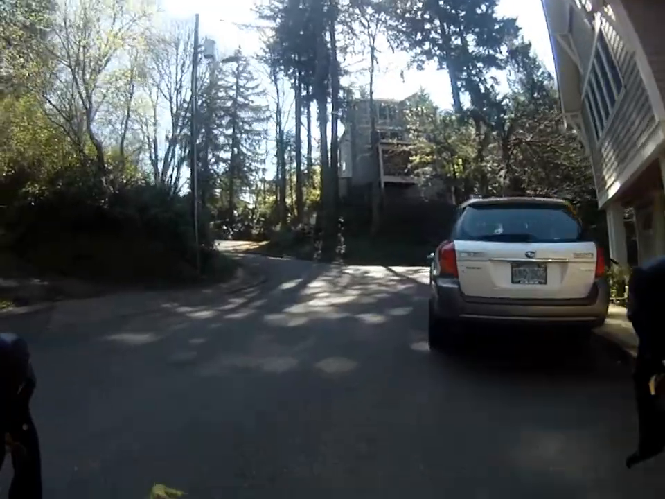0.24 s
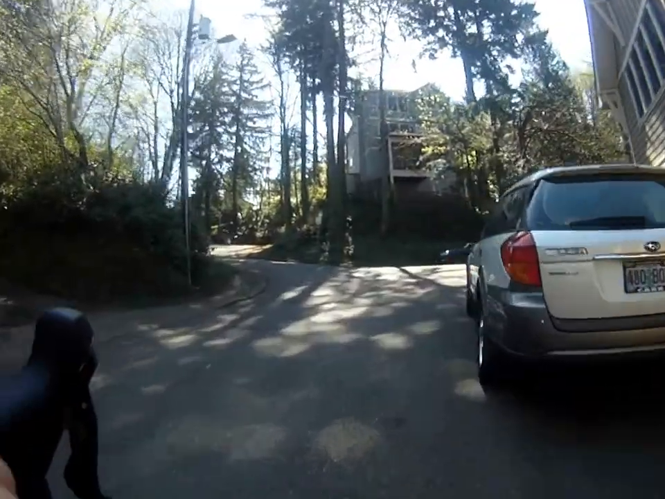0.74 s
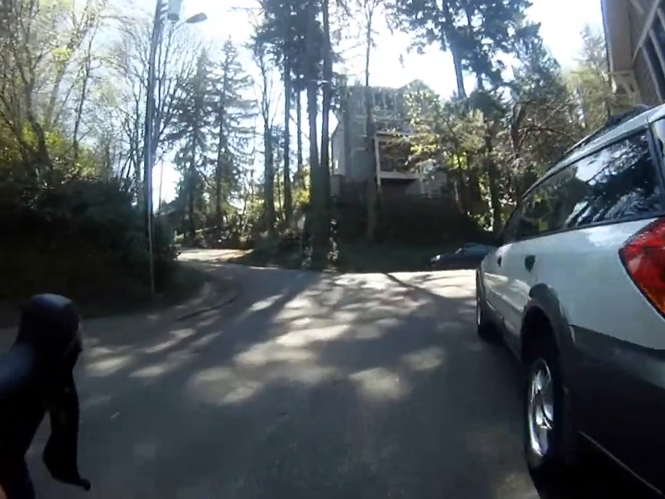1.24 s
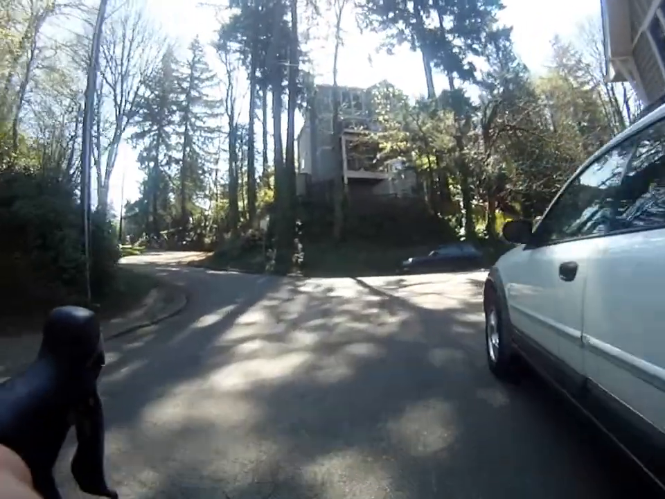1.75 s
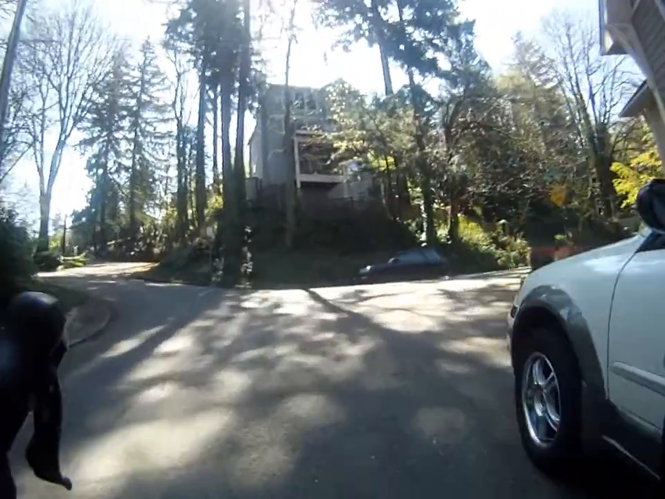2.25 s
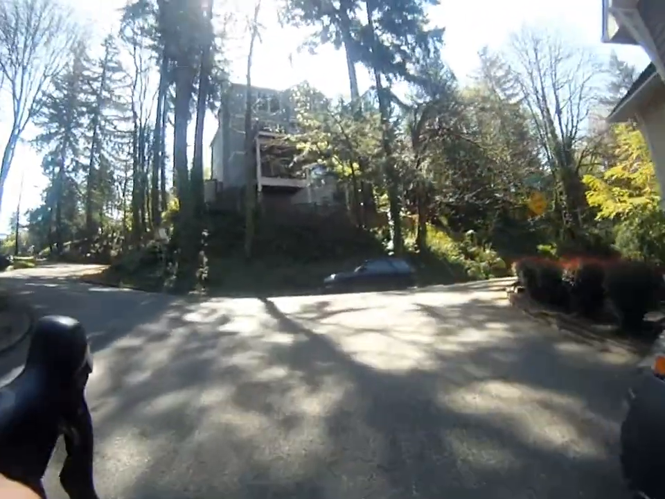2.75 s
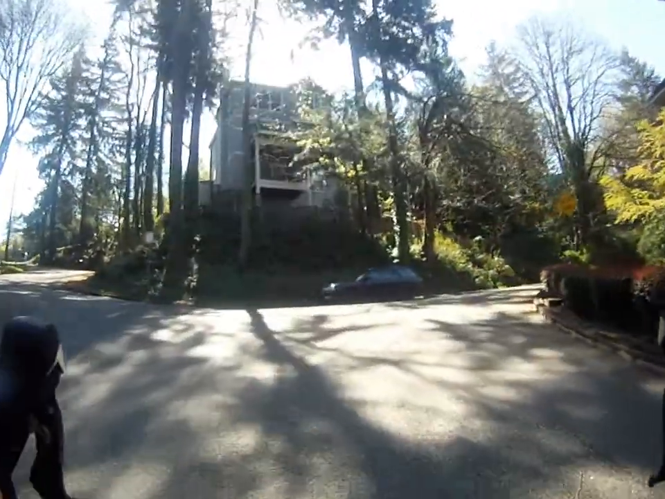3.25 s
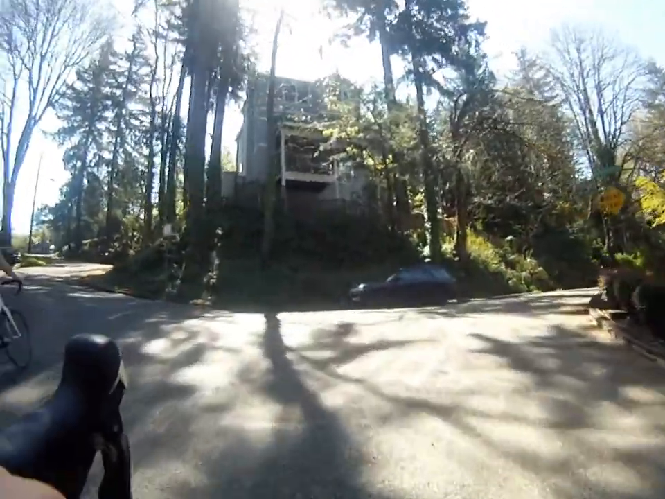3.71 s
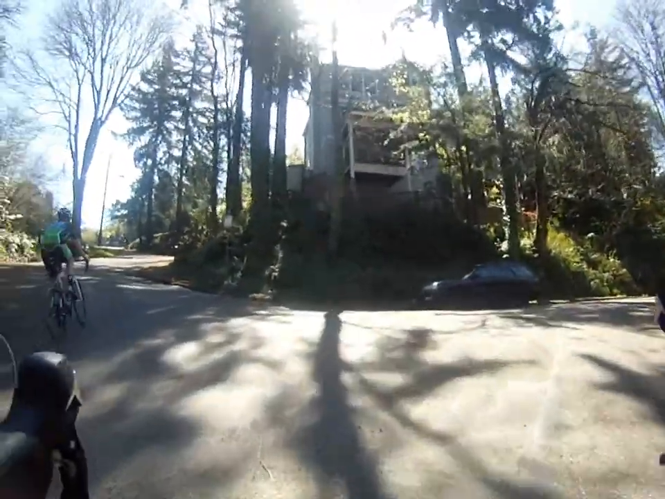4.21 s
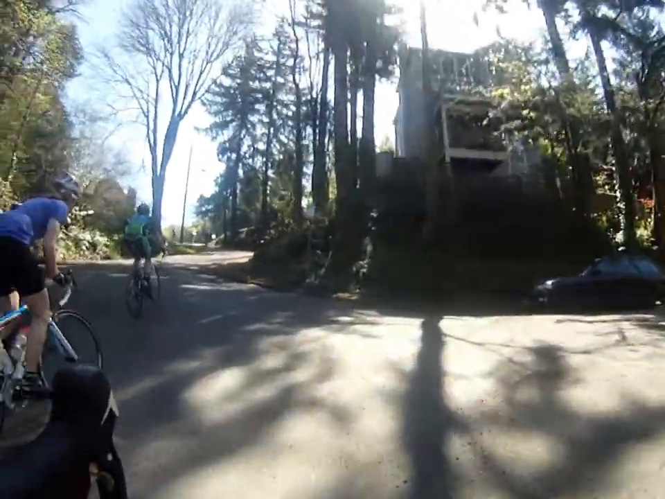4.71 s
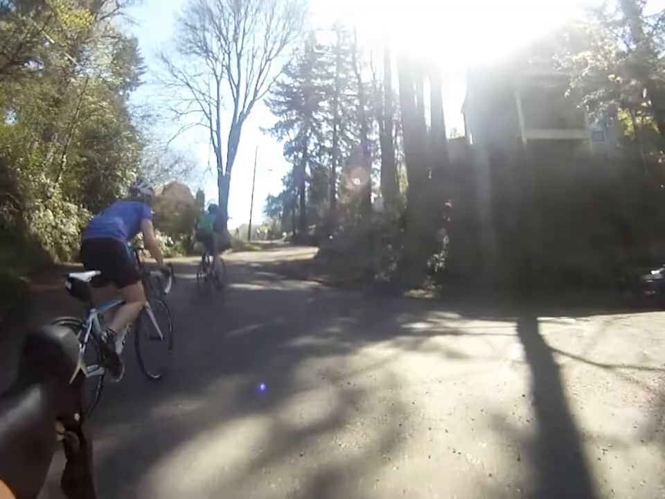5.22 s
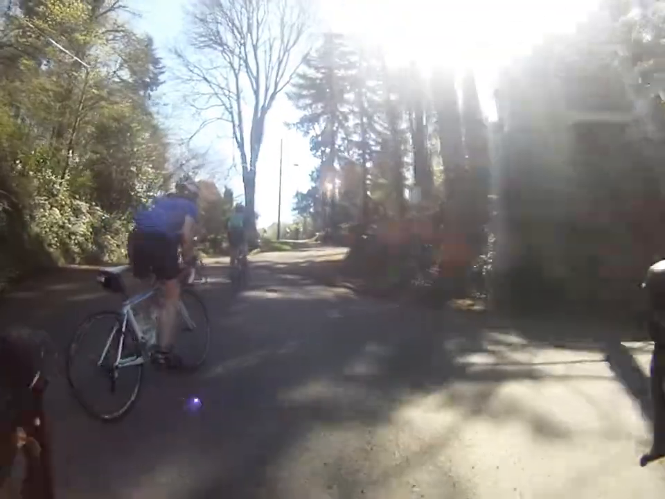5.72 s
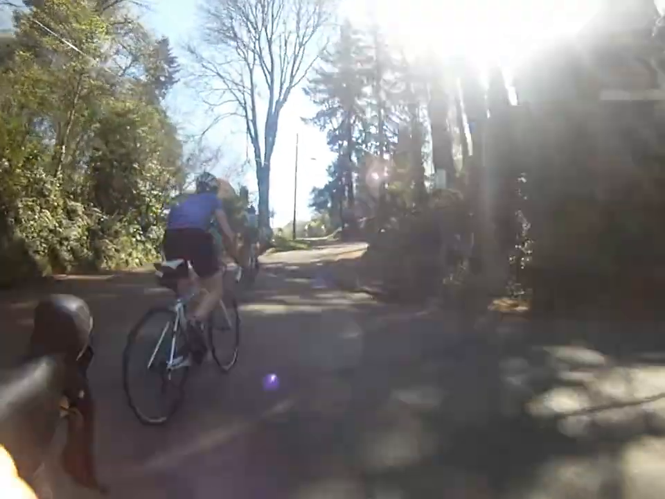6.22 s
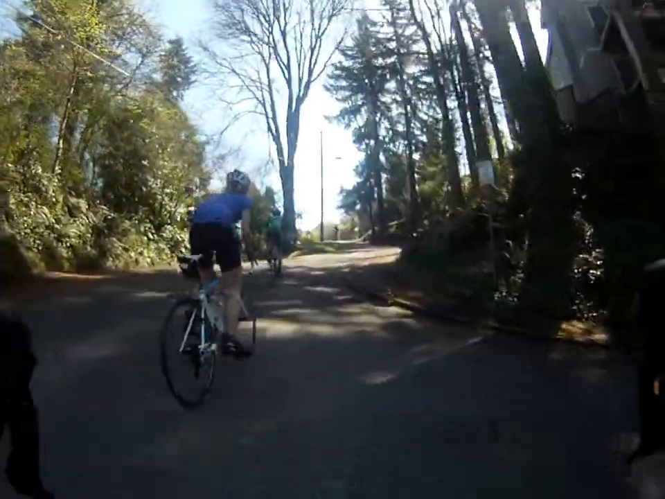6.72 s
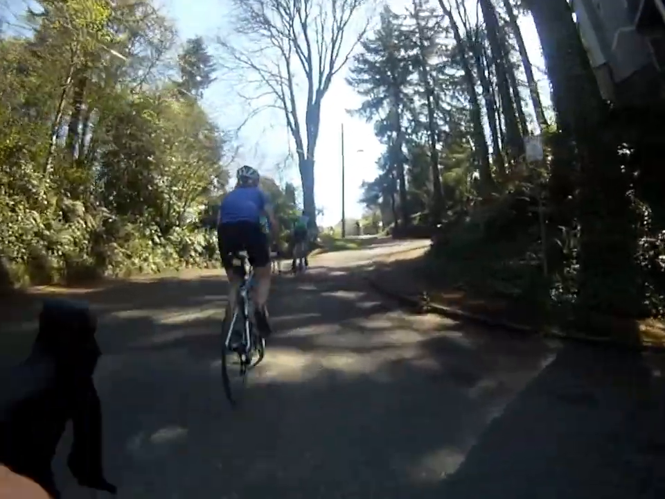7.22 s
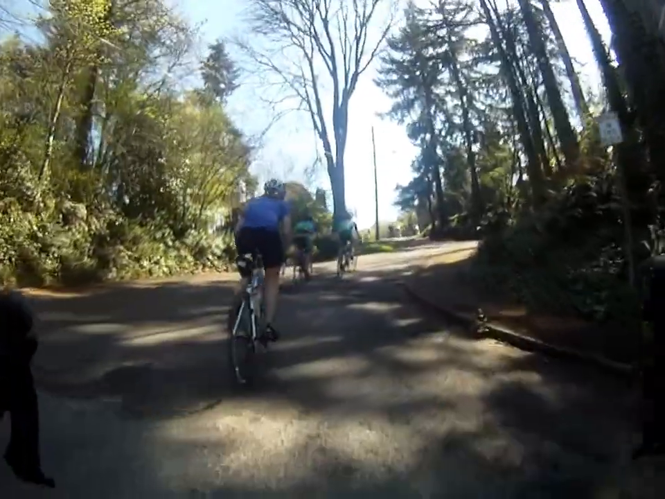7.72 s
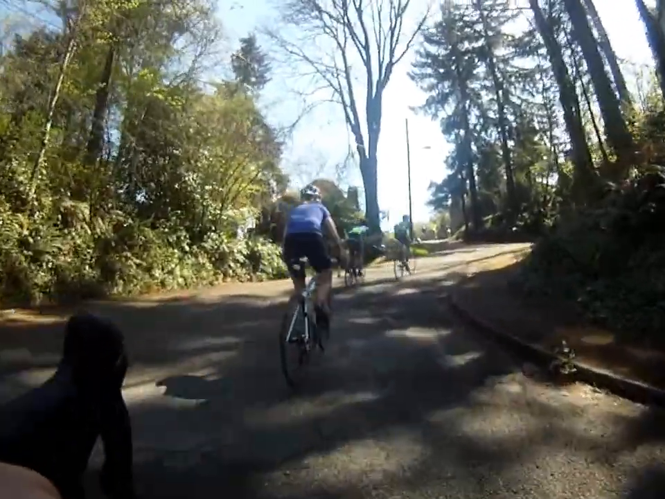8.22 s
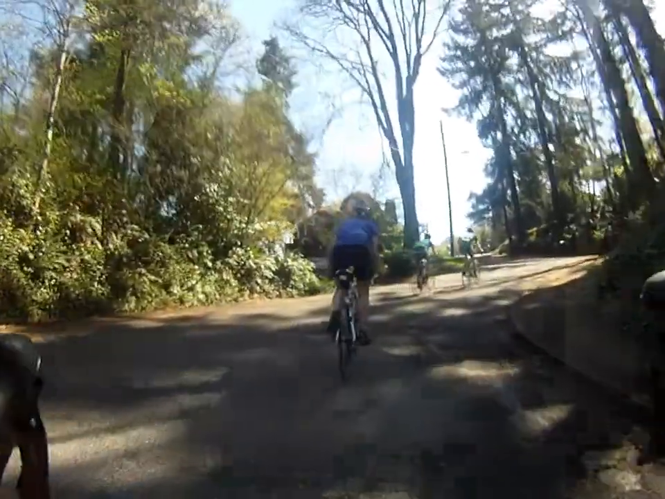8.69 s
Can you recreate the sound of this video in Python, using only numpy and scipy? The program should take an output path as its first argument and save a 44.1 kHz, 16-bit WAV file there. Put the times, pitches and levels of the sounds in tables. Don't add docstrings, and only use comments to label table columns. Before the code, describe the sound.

A bicycle rolls along an asphalt road outdoors while a loose camera mount shakes right at the microphone. Fast, uneven ticking runs throughout, about sixty ticks a second, broken by irregular sharp plastic snaps and hollow case knocks. Gritty tyre buzz, frame hum and low rumble lie underneath, with small stones pinging off metal. The loudest hits clip and briefly duck the rest.

```python
import sys
import numpy as np
from scipy import signal
from scipy.fft import rfft, irfft
from scipy.io import wavfile
from scipy.ndimage import minimum_filter1d

SR = 44100
rng = np.random.default_rng(int(sys.argv[2]) if len(sys.argv) > 2 else 0)


def to_linear_factor(level_db):
    exponent = np.asarray(level_db, float) / 20
    return 10 ** exponent


def bounce(signal):
    frames = np.transpose(np.atleast_2d(signal))
    limited = np.clip(frames, -1, 1)
    pcm = np.round(limited * 32767).astype(np.int16)
    wavfile.write(sys.argv[1], SR, pcm)


N = 394694


def rms_one(x):
    return x / np.sqrt(np.mean(x ** 2) + 1e-20)


def drift(rate_hz):
    r = np.exp(-80 * np.pi * rate_hz / SR)
    noise = rng.standard_normal(N // 40 + 2002)
    slow = signal.lfilter([1], [1, -2 * r, r * r], noise)[2000:]
    return np.interp(np.arange(N) / 40, np.arange(len(slow)), rms_one(slow))


def in_time(rows):
    start_s, *columns = np.transpose(rows)
    return [np.interp(np.arange(N) / SR, start_s, c) for c in columns]


def ring(clicks, pitch_hz, t60_s):
    r, w = to_linear_factor(-60 / (t60_s * SR)), 2 * np.pi * pitch_hz / SR
    return signal.lfilter([0, np.sin(w)], [1, -2 * r * np.cos(w), r * r], clicks + 1e-18)


def swell(clicks, pitch_hz, t60_s):
    twice = ring(ring(clicks, pitch_hz, t60_s), pitch_hz, t60_s)
    return twice * 2 * np.e * np.log(1000) / (t60_s * SR)


def resonate(x, modes):
    out = 0
    for k, (pitch_hz, width_hz, level_db) in enumerate(modes):
        r = np.exp(-np.pi * width_hz / SR)
        feedback = [1, -2 * r * np.cos(2 * np.pi * pitch_hz / SR), r * r]
        mode = signal.lfilter([(1 - r * r) / 2, 0, (r * r - 1) / 2], feedback, x)
        out = out + (-1) ** k * to_linear_factor(level_db) * mode
    return rms_one(out)


def strike(at, level_db, modes, voice, scatter_db):
    out, luck = 0, rng.standard_normal((len(at), len(modes)))
    for k, (pitch_hz, mode_db, t60_s) in enumerate(modes):
        clicks = np.zeros(N)
        np.add.at(clicks, np.clip(at, 0, N - 1), to_linear_factor(level_db + mode_db + scatter_db * luck[:, k]))
        out = out + voice(clicks, pitch_hz, t60_s)
    return out


def burst(at, level_db, t60_s):
    clicks = np.zeros(N)
    np.add.at(clicks, at, to_linear_factor(level_db))
    envelope = signal.lfilter([1], [1, -to_linear_factor(-60 / (t60_s * SR))], clicks + 1e-18)
    return envelope * rng.standard_normal(N)


# [pitch_hz, level_db per Hz]
RUMBLE_SPECTRUM = [(12, -22), (25, 0), (45, 1), (60, -2), (80, -21), (200, -32), (600, -29.5), (2000, -72),
                   (5000, -53), (7000, -84)]


def rumble():
    hz = np.maximum(np.fft.rfftfreq(N, 1 / SR), 1)
    pitch_hz, level_db = np.transpose(RUMBLE_SPECTRUM)
    shape = to_linear_factor(np.interp(np.log(hz), np.log(pitch_hz), level_db))
    noise = irfft(rfft(rng.standard_normal(N)) * shape, N)
    return to_linear_factor(-33.5 + 1.4 * drift(0.58)) * rms_one(noise)


# [pitch_hz, width_hz, level_db]
FRAME_TUBES = [(241.2, 12.6, 1.5), (346.2, 38, -1), (418, 112, -7.5), (135, 60, -14.5), (88.7, 7.6, -7),
               (534, 159, -14)]


def frame(hum_db):
    return to_linear_factor(hum_db + 1.13 * drift(11)) * resonate(rng.standard_normal(N), FRAME_TUBES)


# [pitch_hz, width_hz, level_db]
FORK_AND_BARS = [(1228, 151, 4.5), (2098, 61, 4.5), (2650, 81, 2), (770, 138, -2), (1856, 180, 0),
                 (3730, 260, -11.5), (3150, 230, -13)]


def tyres(grit_db):
    hiss, out = rng.standard_normal(N), 0
    for k, (pitch_hz, width_hz, level_db) in enumerate(FORK_AND_BARS):
        sizes = to_linear_factor(5.14 * np.minimum(rng.exponential(1, N), 4)) * rng.choice([-1, 1], N)
        grains_per_s = 900 * to_linear_factor(5.0 * drift(35))
        grains = sizes * (rng.random(N) < grains_per_s / SR)
        part = resonate(rms_one(grains) + 0.53 * hiss, [(pitch_hz, width_hz, 0)])
        out = out + (-1) ** k * to_linear_factor(level_db) * np.sqrt(width_hz) * part
    return to_linear_factor(grit_db + 4.5 + 2.3 * drift(26.0)) * rms_one(out)


# [start_s, level_db]
ROUGHNESS = [(0.0, -40), (0.72, -38), (0.87, -36), (1.49, -37), (2.17, -38), (2.64, -36.5), (3.19, -37.5),
             (3.96, -35.5), (4.19, -40), (5.41, -33), (5.81, -37), (6.5, -35.5), (7.48, -36.5),
             (7.65, -36.5), (7.8, -38), (8.37, -38.5), (8.62, -34), (8.95, -38)]


def rolling():
    road_db = in_time(ROUGHNESS)[0]
    road_db = road_db - road_db.mean()
    return frame(-33 + 0.43 * road_db) + tyres(-39.5 + road_db) + rumble()


# [pitch_hz, width_hz, level_db]
CHAIN_AND_STAYS = [(472, 180, 0), (350, 60, -3)]


def pedalling():
    first_s, every_s, push_s = 1.06, 1.41, 0.14
    since_s = (np.arange(N) / SR - first_s + every_s / 2) % every_s - every_s / 2
    push = np.exp(-(since_s / push_s) ** 2) * to_linear_factor(-41 + 3.0 * drift(0.56))
    return push * resonate(resonate(rng.standard_normal(N), CHAIN_AND_STAYS), CHAIN_AND_STAYS)


# [start_s, level_db]
STONES_ON_BARS = [(0.132, -26.5), (0.502, -26), (0.556, -25), (1.1, -23), (1.394, -27), (1.972, -22),
                  (4.821, -14.5), (4.887, -16), (5.074, -25), (5.359, -22), (5.374, -25), (5.831, -28),
                  (5.9, -29), (6.455, -22), (6.489, -30), (6.653, -18), (6.881, -19.5), (7.056, -27),
                  (7.696, -25.5), (7.799, -20.5), (8.524, -26)]
# [start_s, level_db]
STONES_ON_FORK = [(2.1, -28.5), (2.493, -27), (3.837, -30), (5.055, -29), (5.484, -28), (5.584, -30),
                  (5.656, -27), (5.687, -29), (6.178, -26), (7.011, -30), (7.459, -32)]
# [start_s, level_db]
STONES_ON_STEM = [(1.597, -23), (4.497, -5), (4.82, -15.5), (4.83, -6), (4.863, -21), (5.359, -19.5),
                  (6.458, -18.5), (6.652, -30), (7.799, -24), (7.842, -18), (8.143, -25), (8.842, -26)]
# [pitch_hz, spread with the spot struck (0-1)]
STRUCK_TUBES = [(2073, 0.03), (2665, 0.04), (1266, 0.11)]


def stones():
    out, t = np.zeros(N), np.arange(1200) / SR
    for rows, (tube_hz, spread) in zip((STONES_ON_BARS, STONES_ON_FORK, STONES_ON_STEM), STRUCK_TUBES):
        for start_s, level_db in rows:
            at = round(start_s * SR)
            pitch_hz = tube_hz * (1 + spread * rng.standard_normal())
            envelope = t / 0.0034 * np.exp(1 - t / 0.0019)
            out[at:at + len(t)] += to_linear_factor(level_db + 6.5) * envelope * np.sin(2 * np.pi * pitch_hz * t)
    return out


# [start_s of the widest swing, level_db]
ROAD_DIPS = [(0.1, -44), (0.45, -33), (0.77, -30), (1.15, -38), (1.59, -26.5), (2.2, -34), (2.6, -23),
             (2.98, -31), (3.19, -23.5), (3.51, -27), (3.76, -29.5), (4.08, -28.5), (4.49, -23),
             (4.8, -26.5), (5.06, -22.5), (5.28, -21), (5.5, -26.5), (6.12, -23.5), (6.3, -31), (6.53, -26),
             (6.9, -28), (7.2, -22.5), (7.5, -25.5), (7.79, -20), (8.0, -22), (8.2, -29.5), (8.4, -24.5),
             (8.64, -23.5), (8.88, -23)]


def reach():
    build_db_per_s, settle_db_per_s, at_rest_db = 62, 59, -46.5
    t = np.arange(0, N + 400, 400) / SR
    start_s, top_db = np.transpose(ROAD_DIPS)[:, :, None]
    away_s = t - start_s
    each_db = top_db - np.where(away_s < 0, -build_db_per_s * away_s, settle_db_per_s * away_s)
    total_db = 10 * np.log10(to_linear_factor(2 * at_rest_db) + to_linear_factor(2 * each_db).sum(axis=0))
    return np.interp(np.arange(N) / SR, t, total_db)


# [start_s, pitch_hz]
SWAY_PACE = [(0.0, 35.1), (1.17, 28.9), (1.39, 29.0), (1.92, 41.0), (2.09, 40.9), (2.34, 32.3),
             (3.01, 28.9), (3.37, 34.2), (3.46, 30.6), (5.48, 29.4), (5.68, 34.8), (6.78, 33.8),
             (6.88, 30.1), (8.95, 30.8)]
# [pitch_hz, width_hz, level_db]
MOUNT_STOPS = [(3920, 120, 3.5), (2740, 660, -4), (3270, 560, -30), (4630, 1000, -15.5), (5300, 170, -9)]


def mount():
    sway_hz, sway_db = in_time(SWAY_PACE)[0], reach()
    tick_db = -52.5 + 0.7 * (sway_db + 25.5)
    turns = np.cumsum(sway_hz * (1 + 0.06 * drift(8.8))) / SR
    reach_db = 1.2 * drift(9)
    sway = np.sqrt(2) * to_linear_factor(sway_db + reach_db) * np.sin(2 * np.pi * turns)
    at = np.flatnonzero(np.diff(np.floor(2 * turns - 0.125)))
    at = np.clip(at + (0.00067 * SR * drift(40)[at]).astype(int), 0, N - 1)
    touch_db = (reach_db + 1.4 * drift(25))[at]
    scuffs = burst(at, touch_db, t60_s=0.013)
    scuffs[at] += to_linear_factor(touch_db + 14.0)
    rubbing = 0.035 * rng.standard_normal(N)
    return sway + to_linear_factor(tick_db + 11.0) * resonate(scuffs + rubbing, MOUNT_STOPS)


# [start_s, snap_db, knock_db, chatter_ms]
BIG_BUMPS = [
    (3.7944, -3, -34, 4.7),
    (4.4947, 11, -11, 2.1),
    (4.8289, 9, -16, 2.03),
    (5.1969, -4, -0.5, 1.4),
    (6.7157, 3.5, -20, 0.57),
    (7.628, 1.5, -3.5, 1.1),
    (7.8391, 14.5, -7.5, 2.12),
]
# [start_s, snap_db]
LATCH_SNAPS = [(0.362, 5.5), (0.6289, 6.5), (0.7331, 2.5), (0.8904, -1.5), (1.1552, 0), (1.5102, 5.5),
               (1.6264, 1), (1.7588, 4), (1.9408, 6), (2.0155, 4.5), (2.1725, -1.5), (2.2214, -0.5),
               (2.2747, 4.5), (2.751, 7.5), (2.9016, 4.5), (3.0278, 4), (3.3547, 3), (3.6626, 3),
               (3.8517, 1), (4.0479, -1), (4.2898, 4.5), (4.4176, 2), (4.7281, 0), (7.0897, -1), (7.229, 0),
               (8.1184, -0.5), (8.7339, 0)]
# [start_s, snap_db]
LATCH_CLICKS = [(0.6833, -16), (1.2047, -4), (2.2324, -7.5), (2.5076, -11), (2.824, -9), (3.1344, -6),
                (3.1466, -14), (3.4318, -9), (3.8926, -6), (3.9432, -10.5), (3.957, -14.5), (5.215, -15),
                (5.328, -18), (5.3383, -10), (5.7753, -2.5), (5.8658, -4), (5.999, -7.5), (6.3114, -5),
                (6.6101, -3), (6.7875, -12), (7.5876, -6.5), (8.2927, -7.5), (8.4968, -8.5), (8.6084, -20),
                (8.683, -25)]
# [start_s, snap_db]
LATCH_GRAZES = [(0.2237, -25.5), (0.9613, -13.5), (1.0472, -25), (1.1907, -20), (1.2326, -18.5),
                (1.336, -10.5), (2.7866, -15), (2.929, -21), (3.4423, -7), (3.5088, -23), (3.5215, -18.5),
                (3.634, -21), (3.676, -9), (3.7055, -15.5), (3.7565, -11.5), (3.7665, -26), (3.7914, -25),
                (3.8122, -14), (4.0576, -25), (4.072, -20), (4.1408, -19.5), (4.8234, -18), (5.255, -23),
                (6.4208, -16), (8.659, -20), (8.6706, -21)]
# [start_s, snap_db, knock_db]
CASE_KNOCKS = [(0.3784, -15, -11), (1.573, -14, -18.5), (1.6607, -27, -17), (2.5188, -17, -18),
               (2.5248, -21, -18), (3.4073, -10, -13.5), (4.0945, -10, -11.5), (4.4292, -13, -15),
               (4.5577, -11, -11.5), (4.7833, -20, -13.5), (4.8838, -29, -20), (5.0918, -23, -16),
               (5.4058, -18, -24), (5.4433, -11, -20.5), (6.2013, -20, -18.5), (6.3763, -16, -17.5),
               (6.533, -13, -12), (6.919, -18, -15), (7.4497, -29, -21.5), (7.5212, -24, -22),
               (7.774, -20, -14.5), (7.9523, -15, -16.5), (8.0178, -30, -27), (8.4232, -28, -15.5),
               (8.5385, -20, -13), (8.7842, -43, -19), (8.8, -23, -22)]
# [start_s, knock_db]
CASE_TAPS = [(0.456, -34), (0.51, -37), (0.8478, -37), (3.4233, -36), (3.4598, -26.5), (3.5477, -34),
             (4.6472, -29.5), (5.0312, -39), (5.2345, -30), (6.0737, -36), (6.1285, -30), (6.2354, -33),
             (6.6758, -40), (6.8058, -27), (7.143, -36)]


def contacts():
    firm_ms, firm_ms_per_db, loose_ms = 0.52, 0.13, 1.2
    return (BIG_BUMPS
            + [(s, db, -28, firm_ms + firm_ms_per_db * max(db, 0)) for s, db in LATCH_SNAPS]
            + [(s, db, -26, firm_ms) for s, db in LATCH_CLICKS]
            + [(s, db, -54, loose_ms) for s, db in LATCH_GRAZES]
            + [(*row, firm_ms) for row in CASE_KNOCKS]
            + [(s, -28, db, loose_ms) for s, db in CASE_TAPS])


# [low_hz, high_hz, t60_s]
SCRAPE = (2300, 4280, 0.011)


def crack(at, level_db):
    low_hz, high_hz, t60_s = SCRAPE
    band = signal.butter(1, [low_hz, high_hz], "band", fs=SR, output="sos")
    return signal.sosfilt(band, burst(at, level_db, t60_s))


# [pitch_hz, level_db, t60_s]
LATCH_MODES = [(2999, -2, 0.0056), (1370, -16, 0.0098), (3667, -7, 0.0065), (5010, -28.5, 0.011),
               (1980, -31.5, 0.0091)]
# [pitch_hz, level_db, t60_s]
CASE_MODES = [(1314, -6.5, 0.031), (2080, -9.5, 0.025), (2850, -32, 0.014), (3936, 2.5, 0.016),
              (4020, -22, 0.027), (5000, -37, 0.026)]
# [pitch_hz, level_db, t60_s]
WALL_MODES = [(794, -5, 0.027), (2544, -2.5, 0.0086), (1020, -13, 0.018)]


def rattle():
    start_s, snap_db, knock_db, chatter_ms = np.transpose(contacts())
    cycle = SR / LATCH_MODES[0][0]
    chatter = np.array([0, 0.55, 1]) * chatter_ms[:, None] * SR / 1000
    later = cycle * np.round(chatter / cycle)
    at = np.round(start_s[:, None] * SR + later).astype(int).ravel()
    weaker_db = np.array([0, -4, -4])
    snap_db = (snap_db[:, None] + weaker_db).ravel()
    knock_db = (knock_db[:, None] + weaker_db).ravel()
    snap = strike(at - 6, snap_db - 4.5, LATCH_MODES, swell, scatter_db=1.5)
    knock = strike(at, knock_db - 1.5, CASE_MODES, ring, scatter_db=2.2)
    full_db = np.minimum(knock_db, -13)
    walls = strike(at, full_db - 2.5, WALL_MODES[:1], swell, scatter_db=1.8)
    walls = walls + strike(at, knock_db - 2.5, WALL_MODES[1:], swell, scatter_db=1.8)
    rebound = strike(at + 270, snap_db - 33.5, LATCH_MODES[:1], swell, scatter_db=6.5)
    return snap + rebound + knock + walls + crack(at, np.maximum(snap_db - 5.5, knock_db + 6.0))


def scene():
    shaken = rolling() + pedalling() + stones() + mount() + rattle()
    return np.array([shaken, shaken])


SLOW_RATE = 12000


def duck_db(x, knee_db, hold_s, release_db, attack_s):
    half = int(hold_s * SLOW_RATE / 2)
    over_db = np.maximum(20 * np.log10(np.abs(x) + 1e-9) - knee_db, 0)
    held_db = -minimum_filter1d(-over_db, size=2 * half + 1, origin=half)
    ramp_db = release_db * np.arange(len(x)) / SLOW_RATE
    cut_db = np.maximum(np.maximum.accumulate(held_db + ramp_db) - ramp_db, 0)
    r = np.exp(-1 / (attack_s * SLOW_RATE))
    return signal.lfilter([1 - r], [1, -r], cut_db)


def roll_off(x):
    return signal.sosfilt(signal.butter(12, 15170, fs=SR, output="sos"), x)


def record(dry):
    dulled = signal.sosfilt(signal.butter(6, 5500, fs=SR, output="sos"), dry[0])
    slow = signal.resample_poly(dulled, 80, 147)[4::2]
    cut_db = duck_db(slow, knee_db=-1.0, hold_s=0.0095, release_db=197, attack_s=0.0033)
    ducked = slow * to_linear_factor(-cut_db * np.array([[0.9], [1.1]]))
    clipped = np.clip(ducked, np.array([[-0.99], [-0.93]]), np.array([[0.94], [0.99]]))
    settled = signal.sosfilt(signal.butter(1, 14, "high", fs=SLOW_RATE, output="sos"), clipped)
    held = signal.resample_poly(np.repeat(settled, 4, axis=1), 147, 160, axis=1)
    padded = np.pad(held, ((0, 0), (0, 64)))[:, :N]
    finished = np.clip(padded, -1, 1)
    return roll_off(finished)


dry = scene()
out = record(dry)
bounce(out)
```